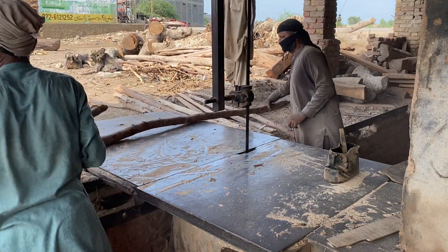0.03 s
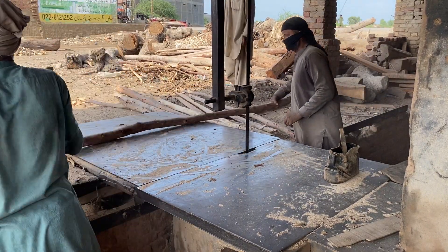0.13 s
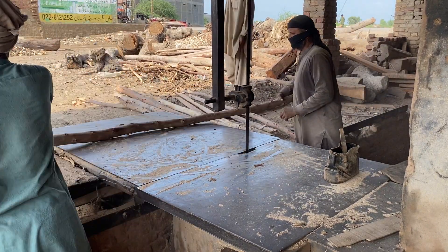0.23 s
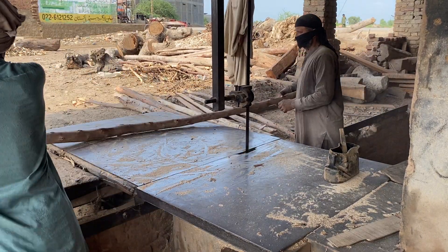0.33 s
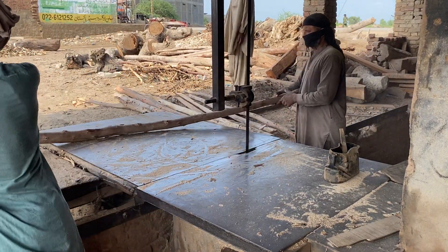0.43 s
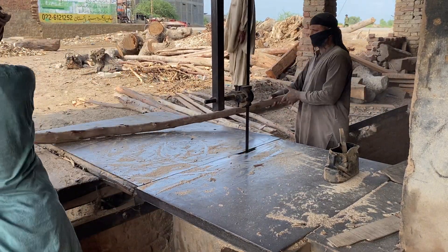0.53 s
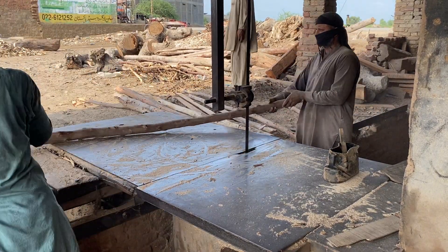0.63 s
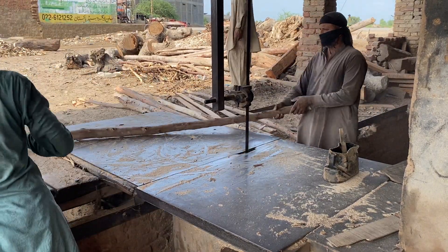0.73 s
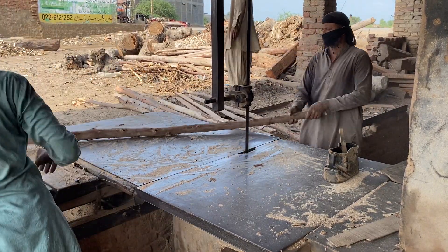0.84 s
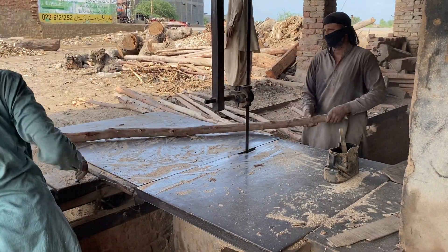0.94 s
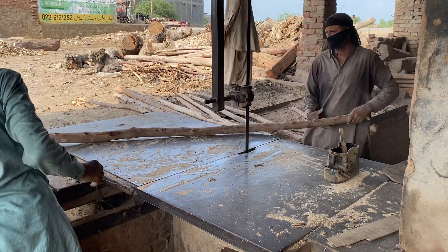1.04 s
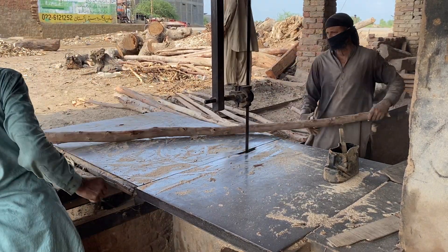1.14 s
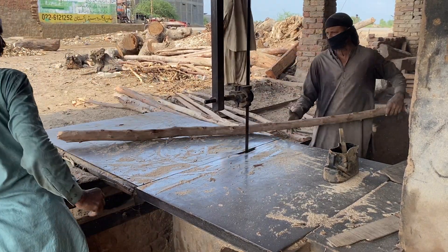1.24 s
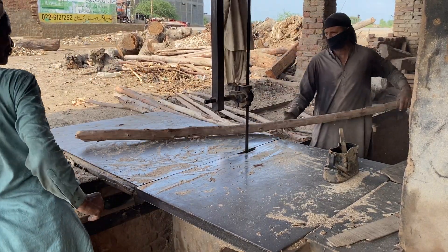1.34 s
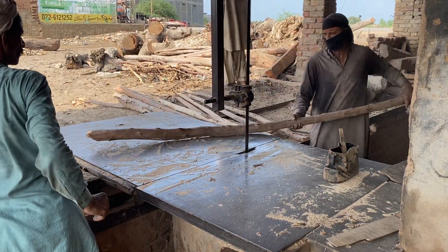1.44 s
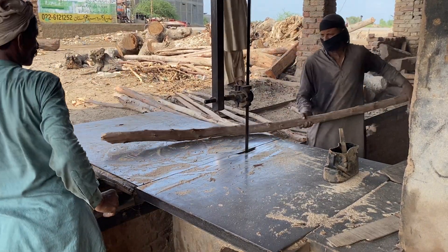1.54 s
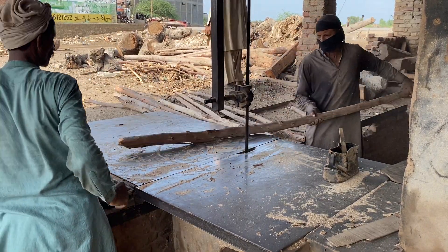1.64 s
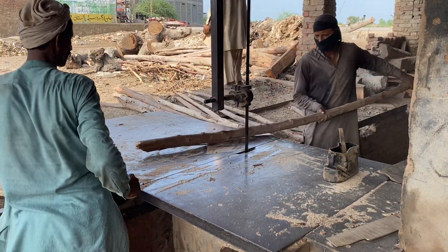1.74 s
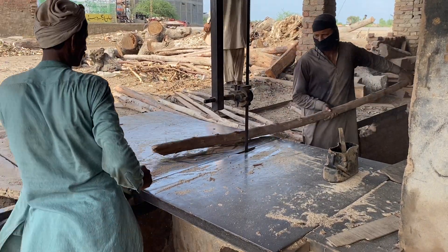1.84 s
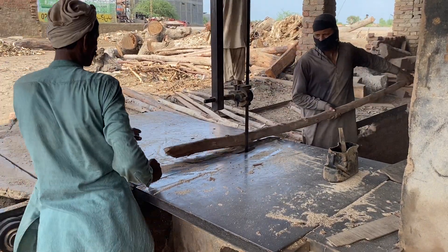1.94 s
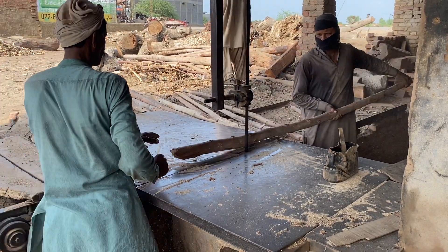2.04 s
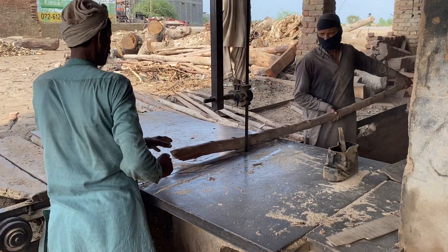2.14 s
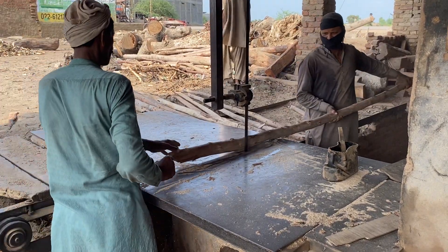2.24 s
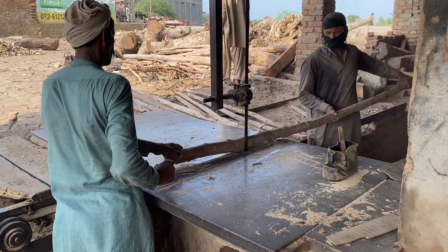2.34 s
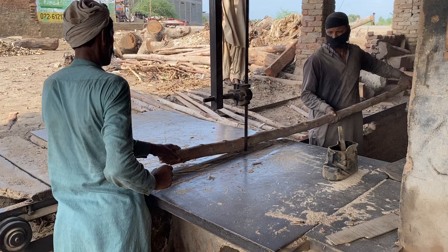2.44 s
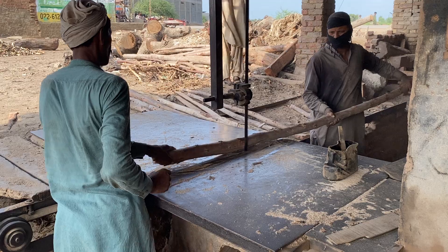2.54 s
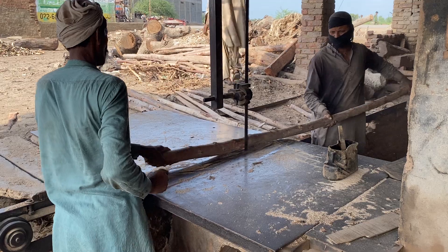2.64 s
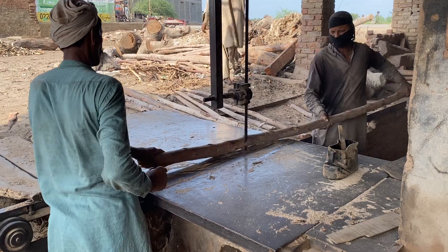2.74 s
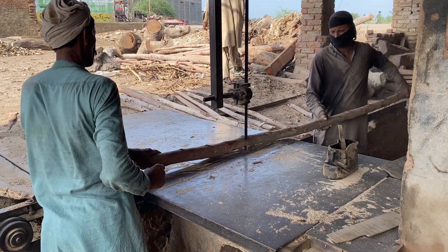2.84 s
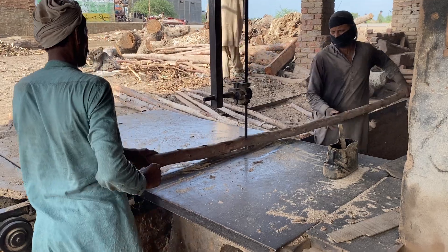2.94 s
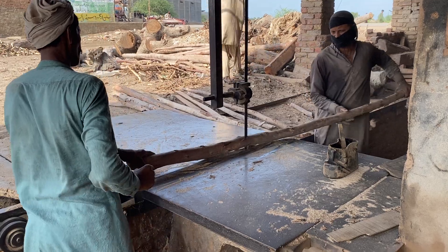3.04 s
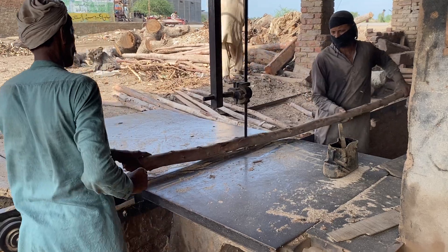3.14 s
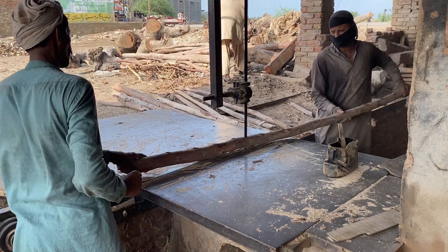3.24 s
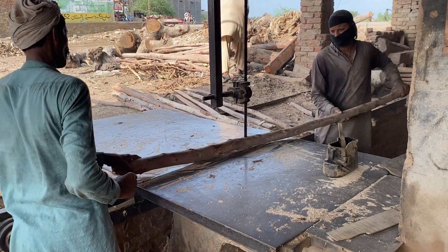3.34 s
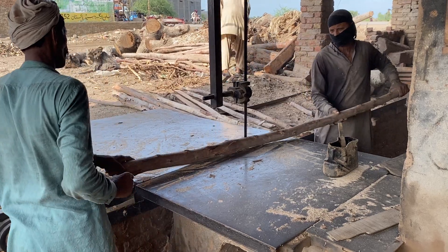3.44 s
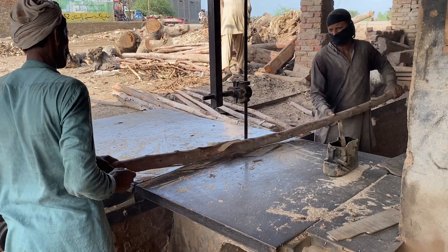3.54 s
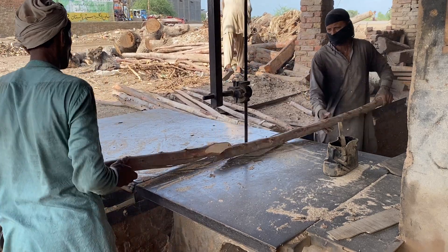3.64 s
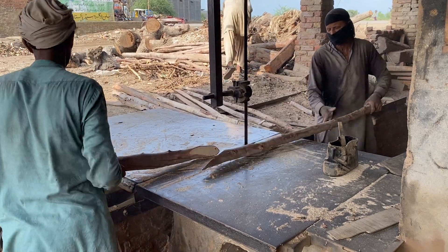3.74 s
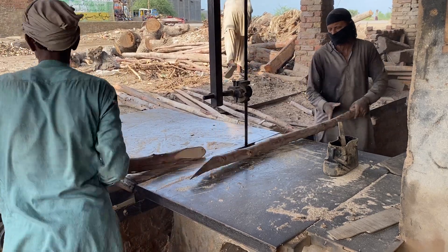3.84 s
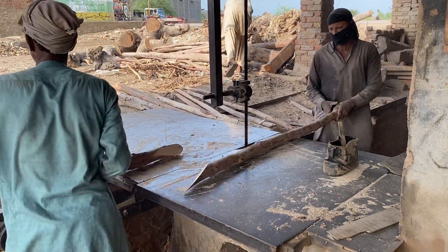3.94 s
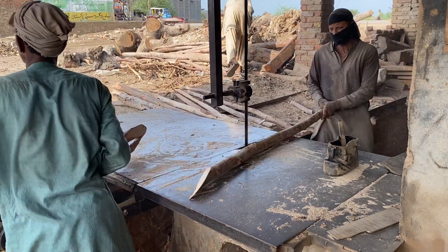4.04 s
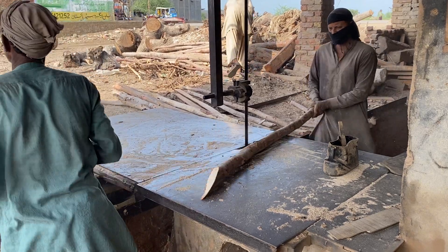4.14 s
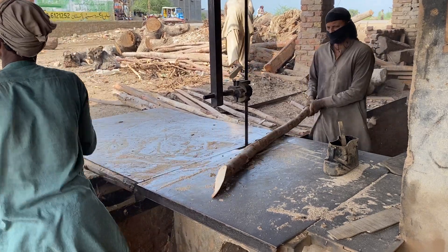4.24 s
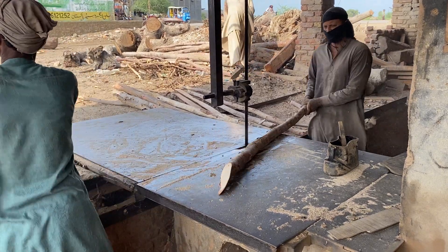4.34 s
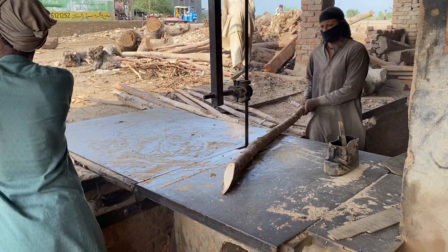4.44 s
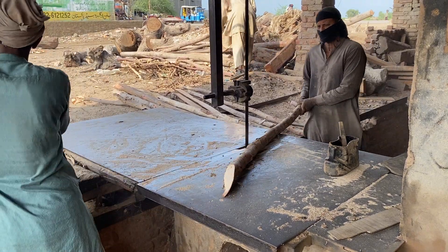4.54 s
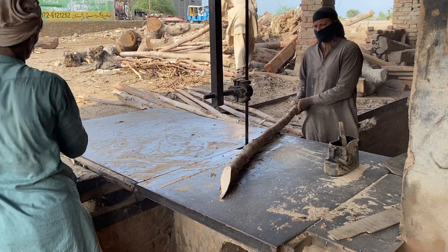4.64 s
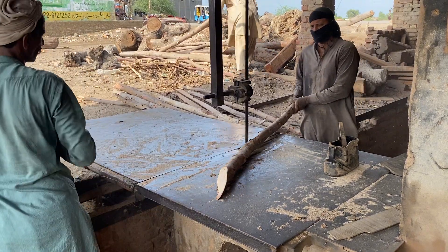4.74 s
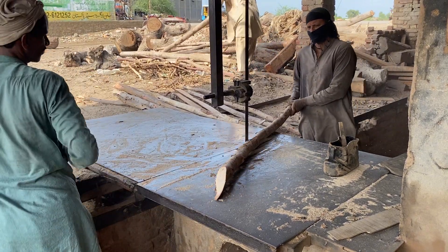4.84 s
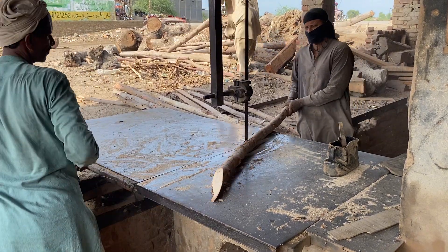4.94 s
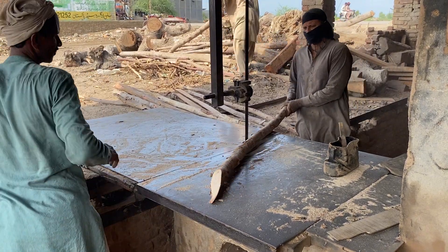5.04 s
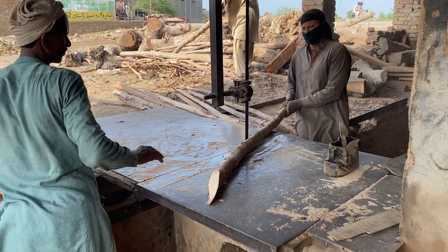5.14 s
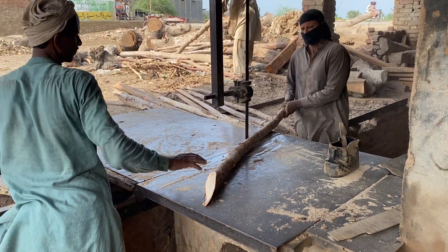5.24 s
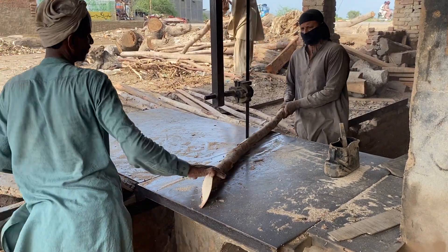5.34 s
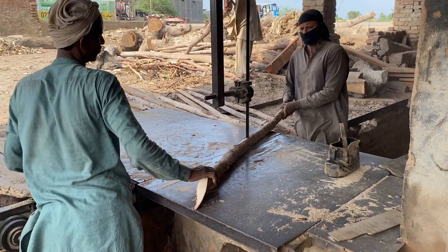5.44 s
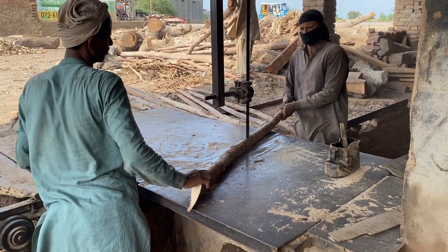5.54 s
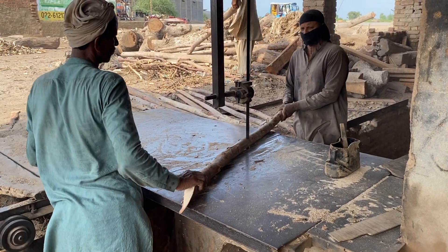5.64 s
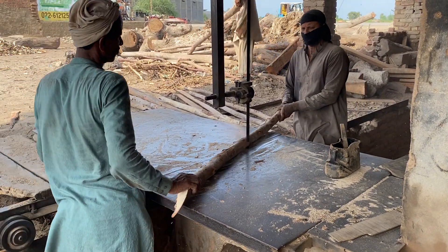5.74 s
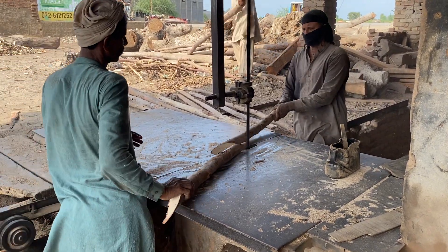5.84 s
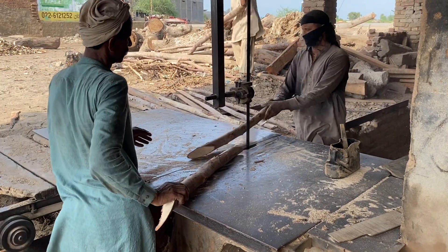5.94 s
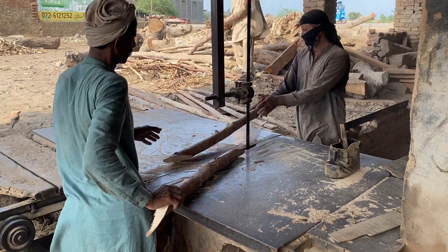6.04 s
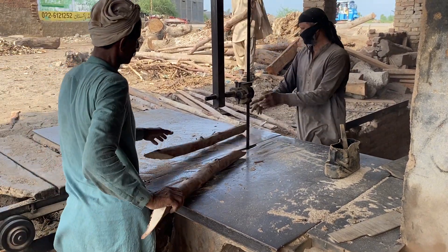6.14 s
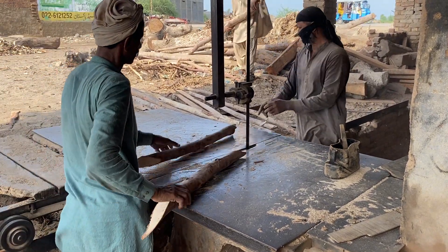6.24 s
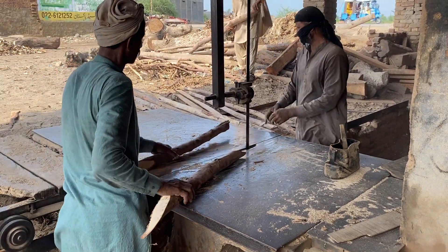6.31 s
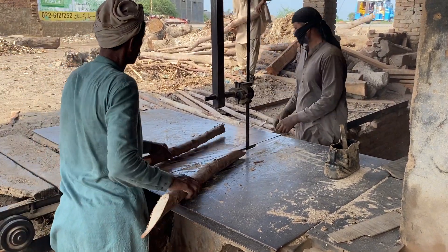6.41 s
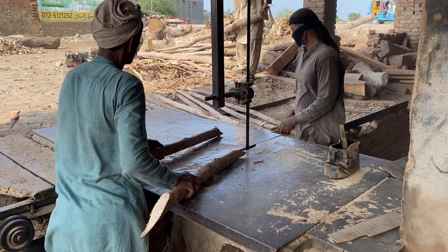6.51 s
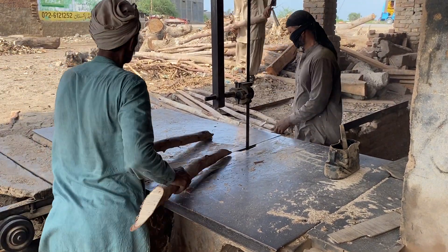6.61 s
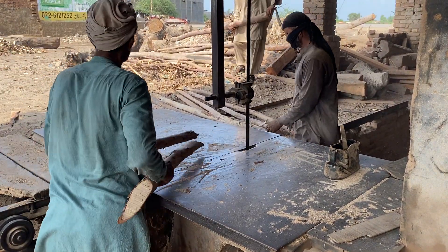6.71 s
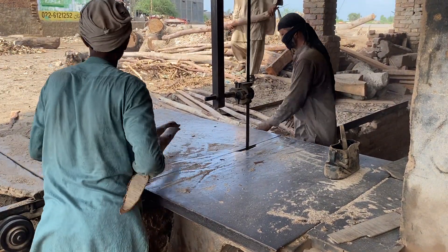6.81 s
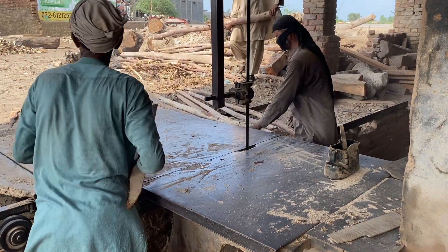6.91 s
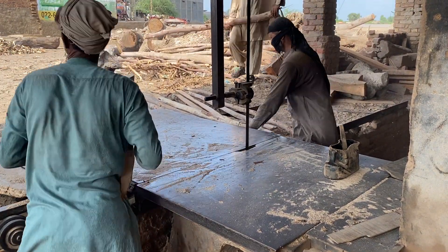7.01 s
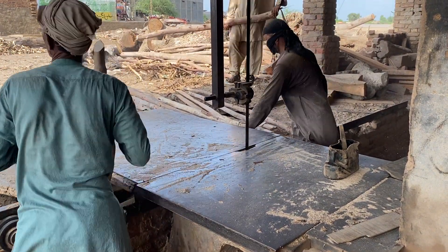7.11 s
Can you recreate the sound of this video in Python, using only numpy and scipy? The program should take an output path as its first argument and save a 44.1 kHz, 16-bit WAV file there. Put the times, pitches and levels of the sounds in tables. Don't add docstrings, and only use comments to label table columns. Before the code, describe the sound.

A big band saw runs continuously in an open shed, heard close in stereo. Wheels and belts give a low rumble, guides rattle, a roller whines thinly in spells, and the blade's bright hiss slides up and down about four times a second, with a small high chirp each lap. Around 0.8-0.95 s, offcuts clatter in a quick cluster of woody knocks. At about 2.3 s a log bites: a loud rasp, metallic singing teeth and short squeals, with sharp cracks around 2.65-2.75 s, then a falling squeal and low table boom until 3.55 s. The rumble drops back, recovering near 4.3 s. A second cut, from 4.9 to 5.8 s, is softer in its wood tearing but still hissy, with low chattering booms near 5.2-5.6 s and clicks at its end. Dull wooden knocks fall around 6.15 s, then the saw idles on to about 7 s.

```python
import sys
import numpy as np
from scipy import signal
from scipy.fft import rfft, irfft, next_fast_len
from scipy.io import wavfile
from scipy.ndimage import uniform_filter1d, map_coordinates

SR = 44100
rng = np.random.default_rng(int(sys.argv[2]) if len(sys.argv) > 2 else 0)


def ratio(d):
    e = np.asarray(d, float) / 20
    return 10 ** e


def put_to_file(sound):
    columns = np.atleast_2d(sound).T
    safe = np.clip(columns, -1, 1)
    whole_steps = np.round(safe * 32767)
    wavfile.write(sys.argv[1], SR, whole_steps.astype(np.int16))


N = 316197
LAP_HZ = 4.412


def unit(x):
    return x / np.sqrt(np.mean(x ** 2) + 1e-20)


def along(points, hz):
    f, v = np.transpose(points)
    return np.interp(np.log(hz + 1), np.log(f + 1), v)


def curves(*tables, edge=None):
    t = np.arange(N) / SR
    s, *cols = np.transpose(np.concatenate(tables))
    lines = [np.interp(t, s, c) for c in cols]
    if edge is None:
        return lines
    inside = sum((t >= rows[0][0]) & (t <= rows[-1][0]) for rows in tables) > 0
    return [np.where(inside, line, edge) for line in lines]


def spells(rows, edge_s):
    gain = np.zeros(N)
    for start, length, db in rows:
        t = np.arange(-edge_s, length + edge_s, 1 / SR)
        shape = np.clip(np.minimum(t, length - t) / (2 * edge_s) + .5, 0, 1)
        gain[round((start - edge_s) * SR):][:len(t)] += ratio(db) * shape
    return gain


def wobble(rate_hz):
    coarse = np.arange(0, N + 16, 16)
    knots = rng.standard_normal(int(N * rate_hz / SR) + 4)
    return np.interp(np.arange(N), coarse, map_coordinates(knots, [coarse * rate_hz / SR]))


def filtered(x, response):
    m = next_fast_len(N + 8192)
    return irfft(rfft(x, m) * response(np.fft.rfftfreq(m, 1 / SR)), m)[..., :N]


def rush(gain_db, alike, patchy_db, source=None):
    source = rng.standard_normal((2, N)) if source is None else source
    hz, t, z = signal.stft(source, SR, nperseg=512)
    field = uniform_filter1d(rng.standard_normal(z.shape[1:]), size=5, axis=0)
    field = uniform_filter1d(field, size=8, axis=1)
    turn = np.arccos(np.clip(along(alike, hz), 0, 1))[:, None] / 2
    z = z * ratio(gain_db(hz[:, None], t) + patchy_db * unit(field)) * [np.cos(turn), np.sin(turn)]
    mid, side = signal.istft(z, SR, nperseg=512)[1][:, :N]
    return unit(np.array([mid + side, mid - side]))


def narrow(phase, width_hz):
    return wobble(width_hz) * np.cos(phase) + wobble(width_hz) * np.sin(phase)


# start t/s, end t/s
CUTS = [
    (2.26, 3.56),
    (4.9, 5.82),
]


def load():
    t = np.arange(N) / SR
    return uniform_filter1d(sum((t > a) & (t < b) for a, b in CUTS) * 1., size=2000)


# t/s, wheels level/dB, blade rub level/dB
IDLE = [(0, -40.5, -34.5), (.9, -39.5, -35.5), (1.86, -38.5, -34), (2.3, -38.5, -34.5), (3.0, -39.5, -35),
        (3.46, -39.5, -34), (3.53, -44, -35.5), (4.1, -45.5, -36.5), (4.3, -40, -33.5),
        (4.45, -41.5, -34.5), (5.4, -40, -38), (5.75, -43.5, -34), (6.2, -43.5, -37), (6.7, -41, -34.5),
        (7.17, -41.5, -36.5)]


def idle_db():
    return curves(IDLE)


# f/Hz, level/dB per Hz
WHEELS = [(15, -62), (25, -36), (34, -48), (48, -17), (65, -2.5), (92, -5.5), (123, -1.5), (168, -1.5),
          (197, -7.5), (243, -2), (480, -18.5), (620, -25.5), (1060, -120)]
# f/Hz, level/dB per Hz
GUIDES = [(240, -14), (400, -2.5), (510, -10), (545, -5.5), (742, -11.5), (926, 2), (1100, -12),
          (1500, -6.5), (1800, 1), (1940, -3), (2120, -2.5), (2590, -5), (4160, -9.5), (5130, -10.5),
          (5600, -11.5), (7280, -23), (12300, -120)]
# f/Hz, width/Hz, level/dB
HUMS = [(123, 8, -46), (167, 9, -45.5), (813, 14, -56), (900, 20, -52.5), (1146, 14, -59), (1643, 17, -52),
        (2030, 21, -48.5)]
# f/Hz, likeness [0-1]
RATTLE_ALIKE = [(60, 0.68), (300, 0.22), (600, 0.66), (1200, 0.24), (1900, 0.7), (3000, 0.53), (4000, 0.74),
                (5500, 0.58)]
GUIDES_FOLLOW, GUIDES_DB, GUIDES_CUT_DB = 0.57, -40, 1.5


def gear():
    t = np.arange(N) / SR
    wheel_db = idle_db()[0]
    swing_db = GUIDES_FOLLOW * (wheel_db - wheel_db.mean())
    guide_db = GUIDES_DB - wheel_db + swing_db + GUIDES_CUT_DB * load()
    low = filtered(rng.standard_normal((2, N)), lambda hz: ratio(along(WHEELS, hz)))
    rumble = unit(low[0] + np.array([[.12], [-.12]]) * low[1])
    rattle = rush(lambda hz, s: along(GUIDES, hz) + 0 * s, RATTLE_ALIKE, patchy_db=1.06)
    hum = sum(ratio(db) * narrow(2 * np.pi * hz * t, width) for hz, width, db in HUMS)
    rattle_gain = ratio(guide_db + 4.5 + 0.18 * wobble(6.6))
    return ratio(wheel_db) * (ratio(4.5) * rumble + rattle_gain * rattle + ratio(guide_db + 39) * hum)


# t/s, bite level/dB, wood level/dB over the bite, weight on the table [0-1]
FEED = [
    [(2.27, -56, -11, .3), (2.31, -30, -1, 0.25), (2.345, -32, -4, .3), (2.385, -48, -7, .3)],
    [(2.39, -41, 2, .3), (2.43, -27.5, -3.5, .3), (2.58, -27.5, -2, 0), (2.73, -25, -6.5, 0.15),
     (2.83, -29, -5.5, 1), (3.04, -24.5, -8, 0.65), (3.15, -28.5, -6, 0.82), (3.5, -30, -4, 0.37),
     (3.535, -40, -9, .5)],
    [(4.915, -47, -10, .5), (4.945, -26.5, -16, .4), (5.02, -27, -14, 0.1), (5.09, -26, -8.5, 0.3),
     (5.2, -27.5, -10.5, 0.35), (5.52, -26.5, -9.5, 0.5), (5.62, -32.5, -10, 0.8), (5.76, -30, -10, .6),
     (5.82, -43, -15, .5)],
]


def feed():
    return curves(*FEED, edge=-120)


# f/Hz, level/dB per Hz
CROSS = [(4300, -22.5), (5500, -14.5), (5900, 0.5), (6200, 0.5), (7000, 0), (7800, -2.5), (9500, -5.5),
         (12500, -6.5), (13700, -5), (14000, -2), (15000, -4), (17500, -7)]
LAP = [(0, 1.04), (.2, 1.015), (.45, .98), (.6, .955), (.68, .925), (.73, .935), (.8, 1.01), (1, 1.04)]
# f/Hz, likeness [0-1]
BLADE_ALIKE = [(4500, .8), (5700, .65), (6500, .97), (9000, .997), (16000, .997)]
UPPER_IDLE_DB, UPPER_CUT_DB = -2, 7
SLIDE, CLAMP = .8, 0.26


def blade():
    sample = np.arange(N)
    hiss = np.hypot(ratio(idle_db()[1]), ratio(feed()[0]))
    upper_db = UPPER_IDLE_DB + UPPER_CUT_DB * load() + 2 * wobble(9.7)
    free = SLIDE * (1 - CLAMP * load())
    share, factor = np.transpose(LAP)

    def modes_db(hz, s):
        width_factor = np.interp(s * LAP_HZ % 1, share, factor)
        rest_hz = hz / width_factor ** np.interp(s * SR, sample, free)
        peak = 1 / (1 + ((rest_hz - 14050) / 350) ** 2)
        return along(CROSS, rest_hz) + peak * np.interp(s * SR, sample, upper_db)

    flutter = ratio(6.5 + 0.34 * wobble(8.0) + 0.58 * wobble(16))
    return hiss * flutter * rush(modes_db, BLADE_ALIKE, patchy_db=0.5)


# start t/s, length/s, level/dB
ROLLER = [(.06, 0.34, -49), (.41, 0.23, -49), (.74, 0.34, -44), (1.35, 0.27, -52), (1.6, 0.26, -46),
          (2.02, 0.09, -41), (2.27, 0.53, -47), (2.95, 0.65, -45), (4.03, 0.2, -47), (4.42, 0.27, -47.5),
          (4.95, .28, -44), (5.53, 0.12, -41.5), (5.8, 0.042, -40), (6.25, 0.41, -47), (6.65, 0.34, -55)]
ROLLER_HZ, ROLLER_REST_DB = 1766, -52.5


def roller():
    phase = 2 * np.pi * ROLLER_HZ * np.arange(N) / SR
    gain = ratio(ROLLER_REST_DB) + spells(ROLLER, edge_s=0.046)
    return gain * (np.sin(phase) + 0.56 * narrow(phase, width_hz=20))


WELD_LOUD = [3, 5, 6, 27, 30]
WELD_SHARE, WELD_S, WELD_HZ, WELD_RISE_HZ = .67, .035, 5260, 250
WELD_DB, WELD_LOUD_DB = -44.5, 7


def weld():
    out, t = np.zeros(N + SR), np.arange(round(WELD_S * SR)) / SR
    swell = np.sqrt(2) * np.hanning(len(t))
    for lap, (scatter, bend) in enumerate(rng.standard_normal((int(N / SR * LAP_HZ), 2))):
        phase = 2 * np.pi * ((WELD_HZ + 60 * bend) * t + WELD_RISE_HZ * t ** 2 / (2 * WELD_S))
        db = WELD_DB + 1.2 * scatter + WELD_LOUD_DB * (lap in WELD_LOUD)
        start_s = (lap + WELD_SHARE) / LAP_HZ - WELD_S / 2
        out[round(start_s * SR):][:len(t)] += ratio(db) * swell * np.sin(phase)
    return out[:N]


# t/s, peak
# level/dB, f/Hz, t60/s
KNOCKS = [(.812, -25.5, 795, 0.18), (.87, -29, 1005, .08), (.836, -18, 1870, 0.026),
          (.84, -23, 1026, 0.058), (.852, -25, 503, 0.081), (0.907, -23.5, 250, 0.067),
          (.915, -28, 1090, 0.083), (0.927, -27, 280, 0.073), (3.49, -26, 2450, .04),
          (2.665, -14, 3900, .012), (2.67, -15, 2700, .012), (2.673, -14, 2900, .012),
          (2.688, -17, 3230, .012), (2.719, -12, 3550, .015), (2.741, -10, 4060, 0.011),
          (5.742, -22, 2480, 0.025), (5.754, -23, 2130, .03), (5.806, -33, 1760, 0.13),
          (6.135, -30, 334, 0.088), (6.15, -30, 472, 0.086), (6.158, -32, 900, 0.046),
          (6.165, -22, 218, 0.051), (6.165, -30, 1150, .04), (0.944, -36, 417, .06), (.9, -33, 2060, 0.037),
          (.842, -28, 1510, 0.041), (.86, -32, 2200, .04), (0.879, -30, 1590, .04), (.895, -32, 580, 0.087)]


def knocks():
    out, t = np.zeros(N + SR), np.arange(SR // 4) / SR
    for s, db, hz, t60 in KNOCKS:
        decay = ratio(-60 * t / t60)
        b, a = signal.butter(2, [hz * .5, hz * 2], "bandpass", fs=SR)
        crack = unit(signal.lfilter(b, a, rng.standard_normal(len(t)))) * decay
        ring = np.sin(2 * np.pi * hz * t) * decay * (1 - np.exp(-t / (0.054 * t60)))
        out[round(s * SR):][:len(t)] += ratio(db) * (ring + 0.42 * crack)
    return out[:N]


# start t/s, length/s, level/dB
KNOTS = [
    [(2.64, 0.025, -33), (3.4, 0.034, -33), (3.475, 0.036, -35), (5.73, 0.027, -39)],
    [(2.29, 0.039, -34), (2.61, 0.11, -29.5), (2.98, .2, -33.5), (3.47, 0.043, -29), (5.58, 0.078, -41)],
    [(2.41, 0.043, -32), (2.63, 0.12, -27.5), (3.09, 0.037, -33), (3.43, 0.037, -35), (5.735, 0.033, -32)],
]
WOOD_DB = [-6.5, 0, 5]
WEIGHT_TILT_DB = [13, 6, 2.5]


def wood():
    bite_db, wood_db, weight = feed()
    weight = np.clip(weight, 0, 1)
    return [ratio(bite_db + wood_db + db + tilt_db * weight) + spells(knots, edge_s=.012)
            for db, tilt_db, knots in zip(WOOD_DB, WEIGHT_TILT_DB, KNOTS)]


# f/Hz, level/dB per Hz
GRAIN = [
    [(300, -28), (600, -8.5), (1000, -2.5), (1400, -1), (1900, -22), (9000, -50)],
    [(1100, -42), (1600, -1), (1950, 1.5), (2300, -1.5), (3000, -14), (9000, -45)],
    [(1800, -49), (2500, -3.5), (3800, 1), (4700, 0.5), (6200, -5.5), (8000, -19), (9000, -50)],
]
# f/Hz, likeness [0-1]
CUT_ALIKE = [(300, 0.42), (1000, 1), (2500, 0.74), (5000, 0.71)]


def rasp():
    snaps = (rng.random(N) < 250 / SR) * rng.random(N)
    snaps = unit(uniform_filter1d(snaps, size=40))
    tear = (1 + .3 * snaps) * rng.standard_normal((2, N))
    tear = rush(lambda hz, s: 0 * hz * s, CUT_ALIKE, patchy_db=1.0, source=tear)
    bands = [unit(filtered(tear, lambda hz: ratio(along(shape, hz)))) for shape in GRAIN]
    return sum(ratio(-6.0) * gain * band for gain, band in zip(wood(), bands))


# start t/s, length/s, level/dB
TEETH = [
    [(2.3, .05, -38), (2.5, .08, -46), (2.8, 0.11, -32), (3.35, 0.075, -34), (5.04, 0.061, -49),
     (5.22, 0.18, -40), (5.62, 0.1, -38)],
    [(2.3, 0.08, -36), (2.6, 0.059, -35), (2.81, 0.22, -29), (5.05, .06, -48)],
    [(2.44, 0.27, -32), (2.98, 0.36, -29.5), (5.0, .16, -38), (5.2, 0.24, -39), (5.5, .1, -38)],
    [(2.295, .05, -31), (2.5, 0.094, -28), (2.64, .09, -24), (3.13, 0.29, -27.5), (5.25, 0.091, -41),
     (5.47, .08, -39), (5.65, 0.11, -35)],
]
# t/s, f/Hz
TOOTH_RATE = [(2.2, 632), (2.7, 631), (2.95, 627), (3.6, 626), (4.8, 631), (5.9, 628)]
TEETH_UNDER_DB, TOOTH_EDGE_S = -17.5, .03


def teeth():
    phase = 2 * np.pi * np.cumsum(curves(TOOTH_RATE)[0]) / SR
    rest = ratio(feed()[0] + TEETH_UNDER_DB)
    levels = [rest + spells(rows, TOOTH_EDGE_S) for rows in TEETH]
    levels += [ratio(-9.5) * wood()[2]] * 2
    out = np.zeros(N)
    for partial, gain in enumerate(levels, 1):
        tone = 0.66 * np.sin(partial * phase) + narrow(partial * phase, width_hz=40)
        out += ratio(-8.0) * gain * tone
    return out


# start t/s, end t/s, from f/Hz, to f/Hz, level/dB
SQUEALS = [(2.293, 2.336, 3170, 3200, -34), (2.419, 2.472, 3530, 3900, -33),
           (2.43, 2.697, 1720, 1950, -35.5), (2.629, 2.77, 3480, 4100, -30),
           (2.64, 2.716, 2850, 2900, -28.5), (2.8, 3.199, 1245, 950, -35), (2.964, 3.137, 2030, 2020, -38),
           (3.448, 3.516, 2400, 2500, -34), (5.281, 5.571, 963, 900, -38.5), (5.5, 5.657, 1800, 1850, -41)]
SQUEAL_WIDTH_HZ, WIDTH_PER_GLIDE = 70, .6


def squeals():
    out = np.zeros(N)
    for start, end, from_hz, to_hz, db in SQUEALS:
        width_hz = SQUEAL_WIDTH_HZ + WIDTH_PER_GLIDE * abs(to_hz - from_hz)
        u = np.linspace(0, 1, round((end - start) * SR))
        phase = 2 * np.pi * np.cumsum(from_hz + (to_hz - from_hz) * u) / SR
        knots = rng.standard_normal(size=(2, 400))
        a, b = [map_coordinates(k, [u * (end - start) * width_hz]) for k in knots]
        swell = np.sqrt(np.sin(np.pi * u))
        out[round(start * SR):][:len(u)] += ratio(db) * swell * (a * np.cos(phase) + b * np.sin(phase))
    return out


# start t/s, length/s, level/dB
BOOM = [
    [(2.87, 0.14, -31.5), (3.09, 0.14, -36), (3.33, .16, -34), (5.17, 0.054, -30.5), (5.26, 0.19, -30),
     (5.48, 0.061, -24), (5.55, 0.16, -34)],
    [(2.79, .16, -31), (2.95, 0.062, -30.5), (3.04, 0.18, -31), (3.28, 0.18, -33), (5.25, 0.11, -36),
     (5.37, 0.1, -33), (5.5, 0.11, -36.5)],
]
TABLE_HZ = [117.5, 150.7]
BOOM_UNDER_DB = -18


def boom():
    t = np.arange(N) / SR
    bite_db, _, weight = feed()
    rest = ratio(bite_db + BOOM_UNDER_DB) * np.clip(weight, 0, 1)
    out = np.zeros(N)
    for rows, hz in zip(BOOM, TABLE_HZ):
        gain = (rest + spells(rows, edge_s=.02)) * ratio(3.3 * wobble(45))
        phase = 2 * np.pi * (hz * t + np.cumsum(0.0505 * hz * wobble(18)) / SR)
        out += 1.1 * gain * np.sin(phase)
    return out


def scene():
    jolt = ratio(load() * (0.33 * wobble(14) + 0.96 * wobble(40)))
    idling = gear() + roller() + weld()
    return idling + jolt * (blade() + rasp() + squeals()) + knocks() + teeth() + boom()


def top_cut(x):
    return signal.sosfilt(signal.butter(12, 16880, fs=SR, output="sos"), x)


# f/Hz, lead/turns
LEAD = [(200, 0), (1100, .06), (2400, 0), (3300, -.06), (3800, 0), (6850, 0), (9000, .5), (11150, 1),
        (13200, 1.5), (15400, 2)]
# f/Hz, left - right level/dB
BALANCE_DB = [(40, -3), (150, 2.5), (380, 1.2), (700, -2), (1500, 0.2), (3000, 1.3), (6000, 2),
              (12000, -0.4)]
TOP_HZ = 15740


def record(dry):
    side = np.array([[.5], [-.5]])
    f, turns = np.transpose(LEAD)

    def ports(hz):
        lead = np.exp(-2j * np.pi * side * np.interp(hz, f, turns))
        return ratio(side * along(BALANCE_DB, hz)) * lead * (hz < TOP_HZ)

    dry = dry / (1 + np.abs(dry / .7) ** 4) ** (1 / 4)
    mix = filtered(dry, ports)
    return top_cut(mix)


dry = scene()
out = record(dry)
put_to_file(out)
```